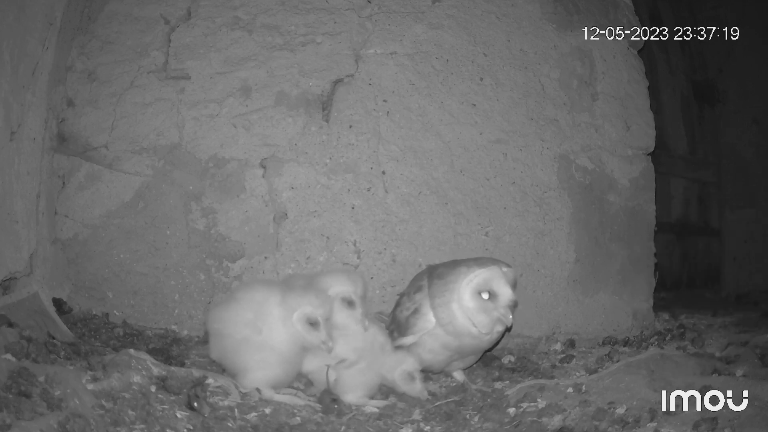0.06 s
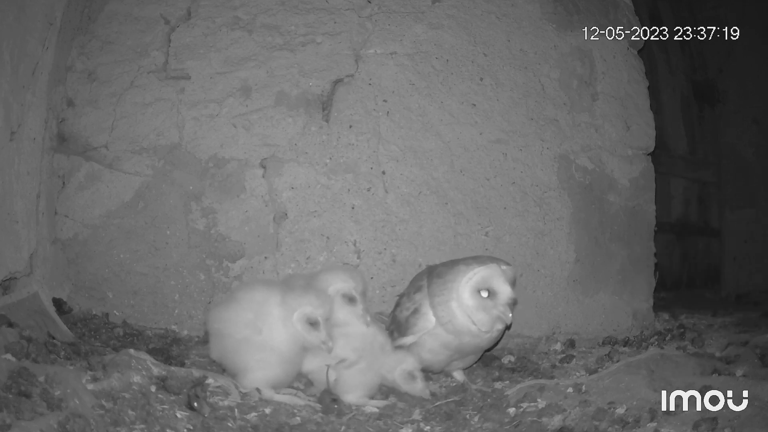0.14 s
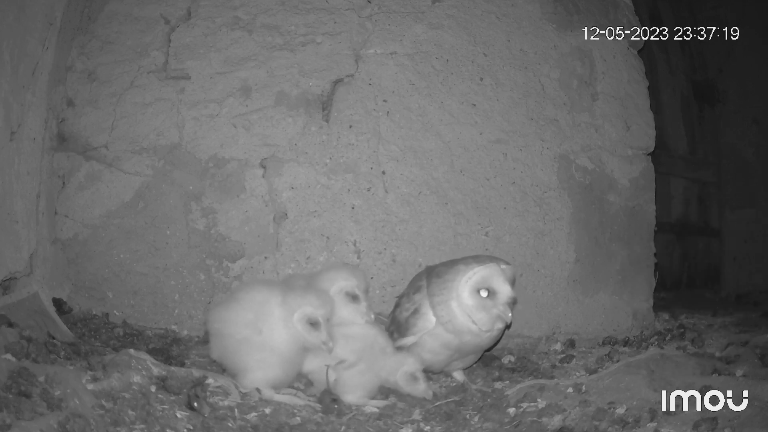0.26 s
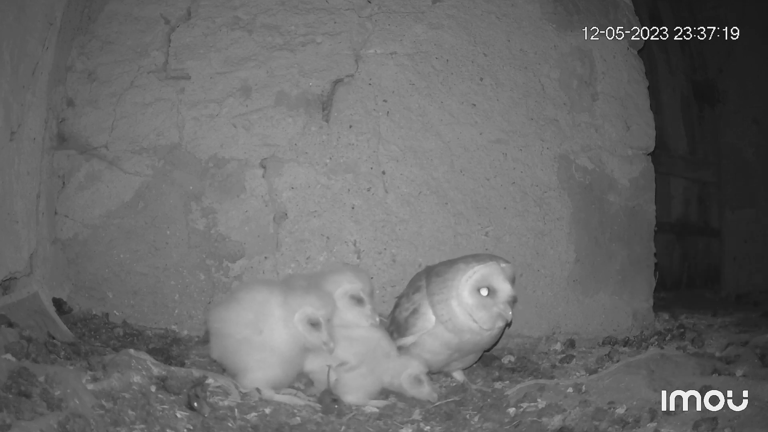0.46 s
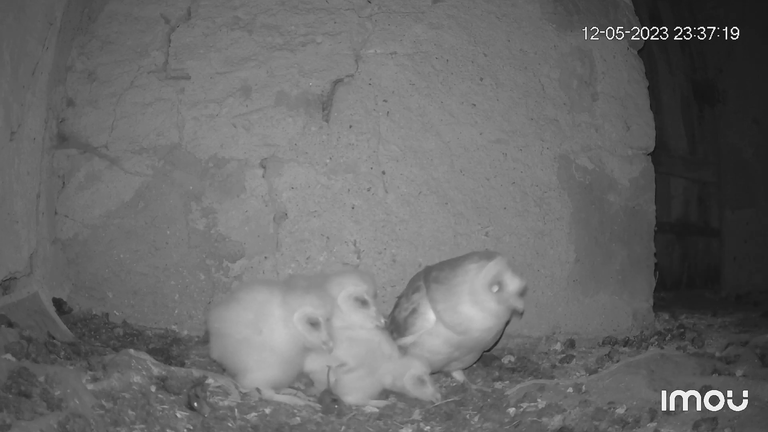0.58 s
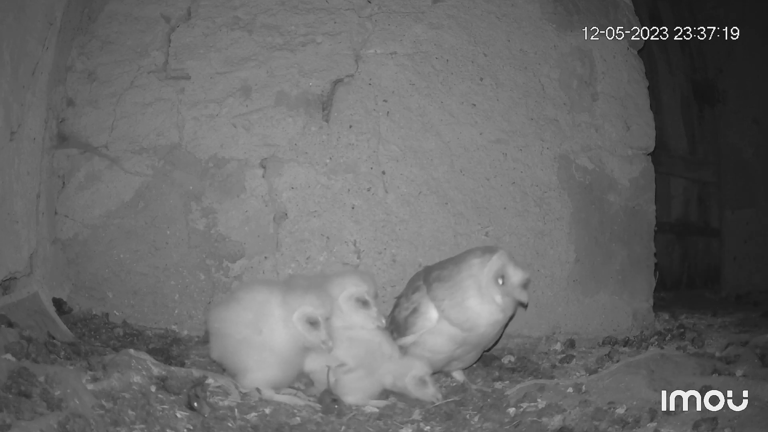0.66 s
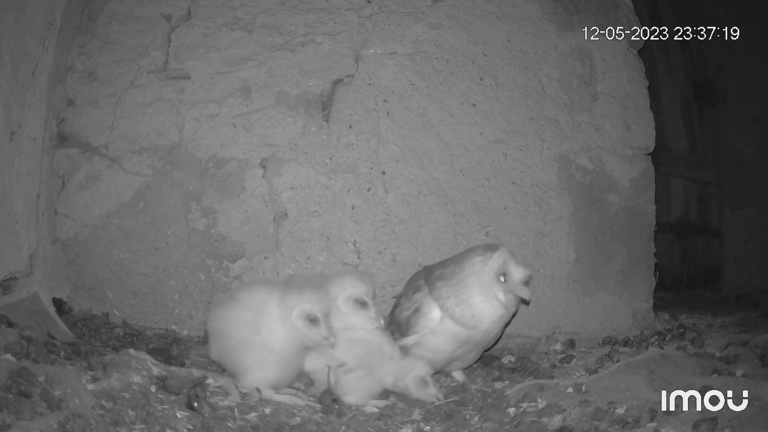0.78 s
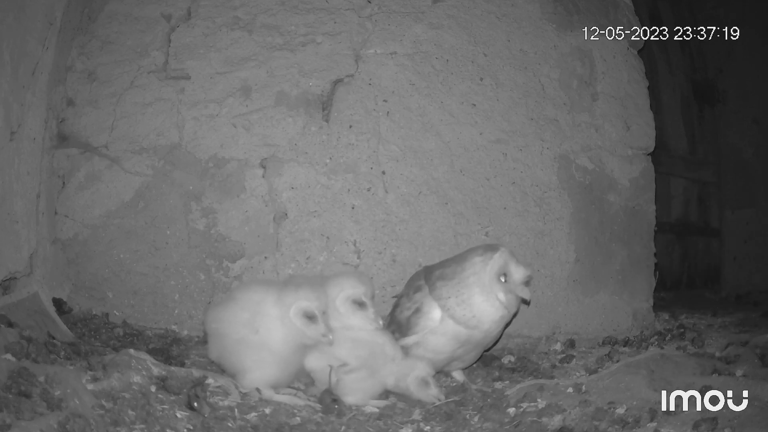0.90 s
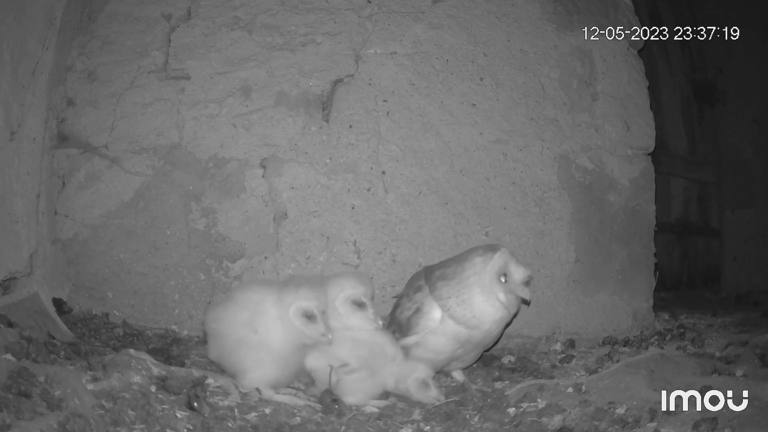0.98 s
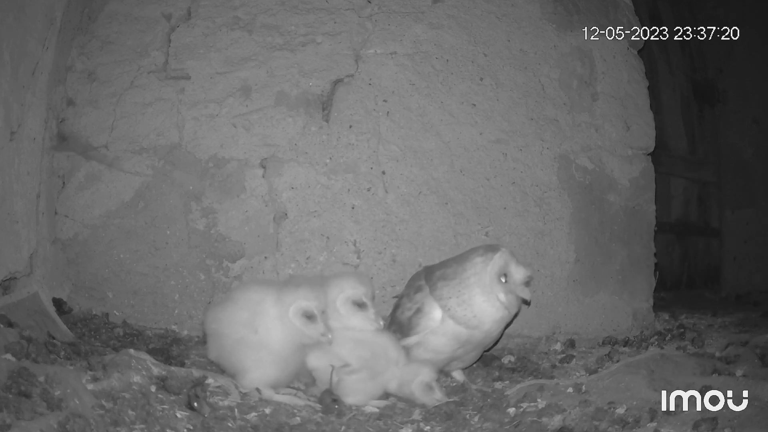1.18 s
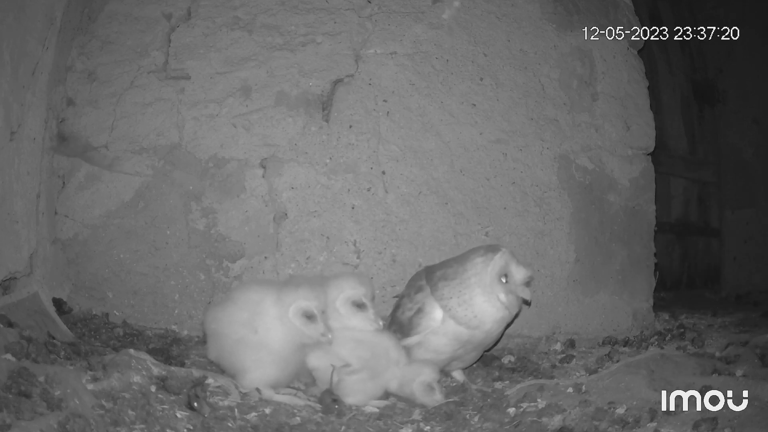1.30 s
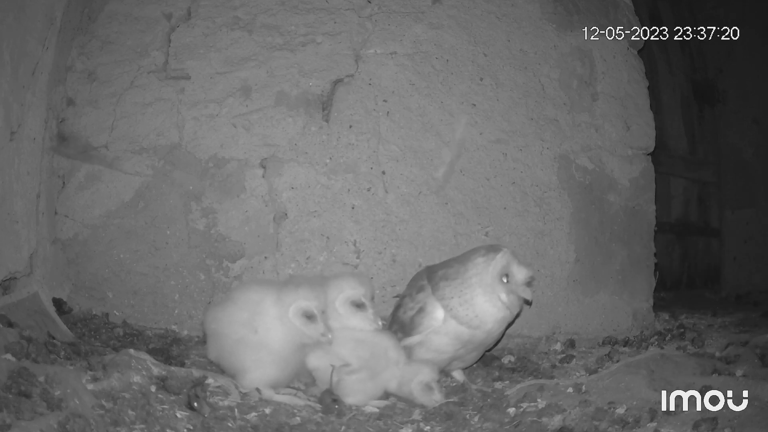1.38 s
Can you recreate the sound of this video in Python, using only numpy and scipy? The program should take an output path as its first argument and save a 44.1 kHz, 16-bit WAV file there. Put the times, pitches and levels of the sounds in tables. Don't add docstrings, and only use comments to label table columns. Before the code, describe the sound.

A barn owl chick gives a short, fluttering hissing rasp close by, then a dry beak click; deep wing-beat gusts thump the microphone, and a smoother, fainter rasp rises at the end in a small stone nest space.

```python
import sys
import numpy as np
from scipy import signal
from scipy.fft import rfft, irfft
from scipy.io import wavfile
from scipy.ndimage import uniform_filter1d

SR = 44100
rng = np.random.default_rng(int(sys.argv[2]) if len(sys.argv) > 2 else 0)


def wav_record(signal):
    frames = np.transpose(np.atleast_2d(signal))
    bounded = np.clip(frames, -1, 1)
    quanta = np.round(bounded * 32767).astype(np.int16)
    wavfile.write(sys.argv[1], SR, quanta)


def makeup_ratio(level_db):
    decades = np.asarray(level_db, float) / 20
    return 10 ** decades


N = 63945
T = np.arange(N) / SR
HISS_DB = -78.5


def level(x):
    return x / np.sqrt(np.mean(x ** 2))


def curve(table, outside=-120):
    s, value = np.array(table).T
    return np.interp(T, s, value, left=outside, right=outside)


def ring(x, hz, width):
    b, a = signal.iirpeak(hz, hz / (1.153 * width), fs=SR)
    once = signal.lfilter(b, a, x)
    return signal.lfilter(b, a, once)


def walk(rate):
    hold = int(SR / rate)
    steps = np.repeat(rng.standard_normal(N // 40 + 1), hold)[:N]
    return 0.91 * uniform_filter1d(uniform_filter1d(steps, hold), hold)


def rasp(effort, throat, throb_db, rough_db, grain_hz, patchy_db):
    effort_db = curve(effort)
    puffs_db = rough_db * np.tanh(walk(grain_hz)) + throb_db
    air = level(rng.standard_normal(N) * makeup_ratio(puffs_db))
    below_peak = np.clip(effort_db - effort_db.max(), -30, 0)
    voice = 0
    for k, (hz, width, gain_db, slope) in enumerate(throat):
        band_db = gain_db + slope * below_peak + patchy_db * walk(34.92)
        voice = voice + (-1) ** k * ring(air, hz, width) * makeup_ratio(band_db)
    full_rms = np.sqrt(np.mean(voice[below_peak > -6] ** 2))
    return voice / full_rms * makeup_ratio(effort_db)


# (time [s], level [dB])
NEAR_EFFORT = [(.012, -93), (.027, -53.5), (.045, -49.5), (.1, -41.5), (.17, -40.5), (.24, -38),
               (.345, -40.5), (.368, -54), (.392, -82)]
# (frequency [Hz], width [Hz], level [dB], extra level per effort [dB/dB])
NEAR_THROAT = [(500, 270, -15.5, -.5), (1015, 190, -10.5, -0.7), (1218, 280, -1, -0.35),
               (1606, 62, -3.5, 0.5), (1872, 200, -11, 0), (2610, 340, -2.5, 0.4), (3230, 476, 0.5, -0.18),
               (4027, 494, 2, 0.6), (4940, 250, -26.5, 1.3), (5610, 150, -28, 2.4), (6213, 400, -12, 1.6),
               (6760, 250, -16.5, 1.85), (7150, 180, -19.5, 0.95)]


def near_rasp():
    flutter_hz, flutter_peak_s, flutter_from_s = 45.7, .2285, .17
    depth_db = 3.0 * np.clip((T - flutter_from_s) / .05, 0, 1)
    pulses = np.cos(np.pi * flutter_hz * (T - flutter_peak_s)) ** 4
    throb_db = depth_db * (2 * pulses - .75)
    return rasp(NEAR_EFFORT, NEAR_THROAT, throb_db, rough_db=5.0, grain_hz=170.4, patchy_db=2.0)


# (time [s], level [dB])
FAR_EFFORT = [(1.134, -94.5), (1.139, -68.5), (1.21, -65), (1.29, -58), (1.375, -52.5), (1.4, -56.5),
              (1.42, -52.5), (1.46, -55.5)]
# (frequency [Hz], width [Hz], level [dB], extra level per effort [dB/dB])
FAR_THROAT = [(850, 230, -12, 0.42), (1260, 270, -2, -0.65), (1753, 59, -2, 0), (2065, 100, 3, 0.49),
              (2500, 260, -3, 0), (3130, 140, -7.5, 0.84), (3833, 370, -3, -0.14), (5045, 150, -21.5, 0.41),
              (5530, 370, -13.5, .6), (5916, 220, -18.5, 0.2)]


def far_rasp():
    return rasp(FAR_EFFORT, FAR_THROAT, 0, rough_db=2.5, grain_hz=147.6, patchy_db=1.85)


# (time [s], level [dB], 60 dB decay time [s])
CLICKS = [
    (.001, -58.5, 0.069),
    (0.402, -61.5, 0.059),
    (.4075, -52.5, 0.022),
    (.427, -73, 0.045),
]
# (frequency [Hz], width [Hz], level [dB])
BEAK = [(1700, 300, -3.5), (2437, 490, 8), (2900, 500, 9.5), (4210, 300, -12)]


def beak_clicks():
    env = 0
    for s, db, t60 in CLICKS:
        decay_db = -60 * np.clip(T - s, 0, 9) / t60
        env = env + makeup_ratio(db + decay_db) * (T >= s)
    snap = rng.standard_normal(N) * env
    return 4 * sum(ring(ring(snap, hz, w), hz, 2 * w) * makeup_ratio(db) for hz, w, db in BEAK)


def squeak():
    start_s, length_s, hz, glide_hz_s, level_db = 1.122, .008, 3200, -45000, -79
    d = T - start_s
    phase = 2 * np.pi * (hz * d + .5 * glide_hz_s * d ** 2)
    return makeup_ratio(level_db) * np.exp(-(d / length_s) ** 2) * np.sin(phase)


# (time [s], dip level [dB], size as frequency [Hz], lean [< 0 swell before, > 0
EDDIES = [(0.087, -41, 26, -0.99), (0.127, -46, 30.6, -0.73), (0.158, -37.5, 39, 0.48),
          (0.2145, -41, 25, 0.67), (0.254, -41, 30, -1.7), (.396, -41, 36, 0.19), (0.434, -20.5, 62, -0.37),
          (0.456, -26.5, 62, 0.3), (0.478, -31.5, 87.5, -1.3), (0.5207, -16, 74.2, -0.61),
          (0.537, -23.5, 41, -0.15), (0.556, -21, 73.3, 0.2), (0.58, -38, 59.76, -0.56),
          (0.6164, -14.5, 75.4, 0.38), (.638, -26.5, 29.45, -0.67), (0.6587, -27.5, 96, 0.21),
          (0.812, -39.5, 36, 0.26), (0.913, -37, 52, .3), (0.933, -38, 39.6, 0.14),
          (.967, -39, 30.92, 0.087), (0.997, -40.5, 80, 0.23), (1.021, -38, 36.66, 0.72),
          (1.0468, -41, 43, 0.68), (1.138, -41, 55, -0.052), (1.1722, -33.5, 46.2, 0.13),
          (1.2116, -39.5, 44, -0.2), (1.2322, -35.5, 57, 0.47), (1.307, -43, 50, 1),
          (1.339, -34.5, 28.3, 0.2), (1.438, -36.5, 46.4, 0.62)]


def eddies():
    core_ratio, core_db = 2.25, -17
    out = 0
    for s, db, hz, lean in EDDIES:
        u = np.pi * hz * .8 * (T - s)
        out = out + makeup_ratio(db) * (2 * u ** 2 - 1 + 2 * lean * u) * np.exp(-u ** 2)
        core = (core_ratio * u) ** 2
        out = out + makeup_ratio(db + core_db) * (2 * core - 1) * np.exp(-core)
    return out


def whistle():
    peak_s, hz, level_db = .5063, 199.5, -17.5
    rise_s, fall_s, glide_hz_s = .003, .008, 910
    d = T - peak_s
    swell = 1 - np.sqrt(1 + (d / rise_s) ** 2)
    env = np.exp(np.where(d < 0, swell, -(d / fall_s) ** 2))
    phase = 2 * np.pi * (hz * d + .5 * glide_hz_s * d ** 2)
    over = makeup_ratio(-15) * np.cos(2 * np.pi * 325 * d) + makeup_ratio(-32.5) * np.cos(2 * np.pi * 500 * d)
    over = over * np.exp(-((d - .003) / .011) ** 2)
    return -makeup_ratio(level_db) * (env * np.cos(phase) + over)


# (time [s], level [dB])
DRAUGHT = [(0, -60.5), (.05, -52), (.25, -49.5), (.36, -59.5), (.43, -45), (.51, -31), (.57, -40.5),
           (.62, -35.5), (.67, -40.5), (.71, -60), (.82, -53), (.87, -64.5), (.92, -49.5), (1.04, -48.5),
           (1.095, -62.5), (1.17, -51), (1.34, -51), (1.39, -59.5)]
# (frequency [Hz], spectrum level [dB per Hz])
DRAUGHT_COLOUR = [(12, 6), (30, -3.5), (80, -10), (160, -18), (300, -29), (600, -47), (1500, -70.5),
                  (7000, -88.5)]


def draught():
    bright_from_hz, bright_db_per_db = 190, .5229
    f = np.maximum(np.fft.rfftfreq(N, 1 / SR), 1)
    hz, db = np.array(DRAUGHT_COLOUR).T
    colour = makeup_ratio(np.interp(np.log(f), np.log(hz), db)) * (f > 8)
    tones = rfft(rng.standard_normal(N)) * colour
    upper = 1 / (1 + (bright_from_hz / f) ** 4)
    strength_db = uniform_filter1d(curve(DRAUGHT, outside=-58) + 1.5 * walk(30), size=600)
    brightness = makeup_ratio(bright_db_per_db * (strength_db + 48.5))
    mixed = irfft(tones * (1 - upper), N) + irfft(tones * upper, N) * brightness
    return mixed / irfft(tones, N).std() * makeup_ratio(strength_db)


def stone_room(birds):
    t60_s, level_db = .04, -14.5
    tail = rng.standard_normal(8000) * makeup_ratio(-60 * np.arange(8000) / SR / t60_s)
    tail = tail / np.sqrt(np.sum(tail ** 2))
    return makeup_ratio(level_db) * signal.fftconvolve(birds, tail)[:N]


def circuit_hiss():
    return makeup_ratio(HISS_DB) * rng.standard_normal(N)


def scene():
    birds = near_rasp() + far_rasp() + beak_clicks() + squeak()
    birds = birds + stone_room(birds)
    air = eddies() + whistle() + draught()
    return (birds + air + circuit_hiss())[None]


def thin_treble(x):
    under_db, from_hz, depth_db, luck_db = 28, 950, -30, 4
    f, _, z = signal.stft(x, SR, window="cosine", nperseg=1024, noverlap=512)
    power = (np.abs(z[:512]) ** 2).reshape(128, 4, -1).sum(axis=1)
    db = 10 * np.log10(power + 1e-20)
    treble = f[:512:4, None] > from_hz
    luck = np.repeat(luck_db * rng.standard_normal((64, db.shape[1])), 2, axis=0)
    loudest = np.max(np.where(treble, db, -200), axis=0)
    hiss_bar = HISS_DB - 23 - 2.3
    bar = np.maximum(loudest - under_db + luck, hiss_bar)
    shut = treble * np.clip(bar - db + .5, 0, 1)
    z[:512] *= np.repeat(makeup_ratio(depth_db * shut), 4, axis=0)
    return signal.istft(z, SR, window="cosine", nperseg=1024, noverlap=512)[1][:N]


def band_limit(x):
    return signal.sosfilt(signal.butter(12, 7400, fs=SR, output="sos"), x)


def record(dry):
    low_pass = signal.ellip(8, .2, 50, 7420, fs=SR, output="sos")
    cut = signal.sosfilt(low_pass, dry)
    mix = thin_treble(cut[0])[None]
    return band_limit(mix)


dry = scene()
out = record(dry)
wav_record(out)
```